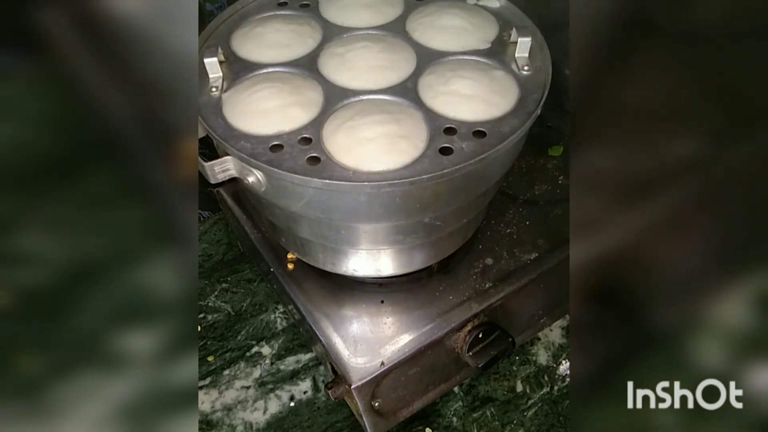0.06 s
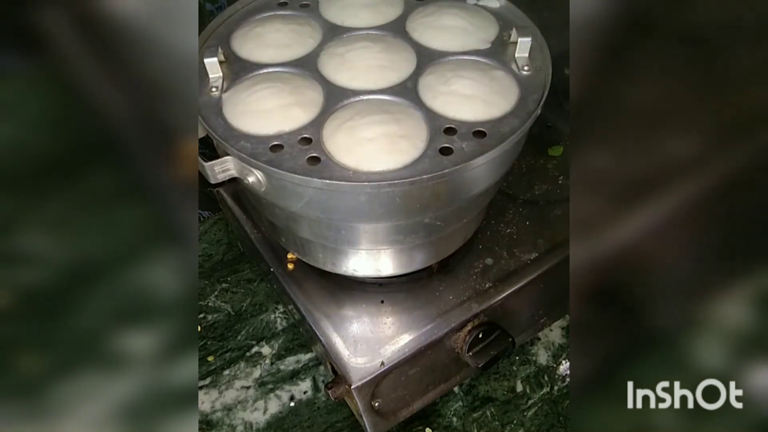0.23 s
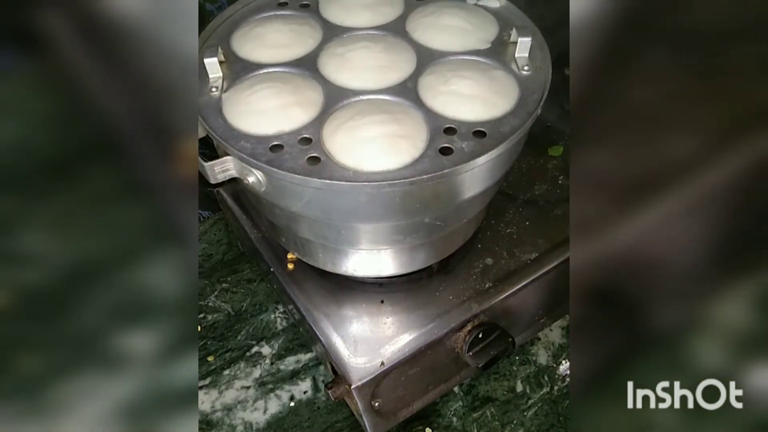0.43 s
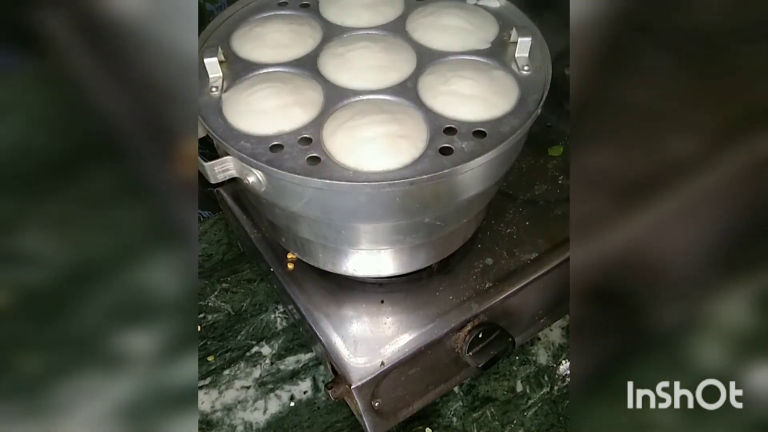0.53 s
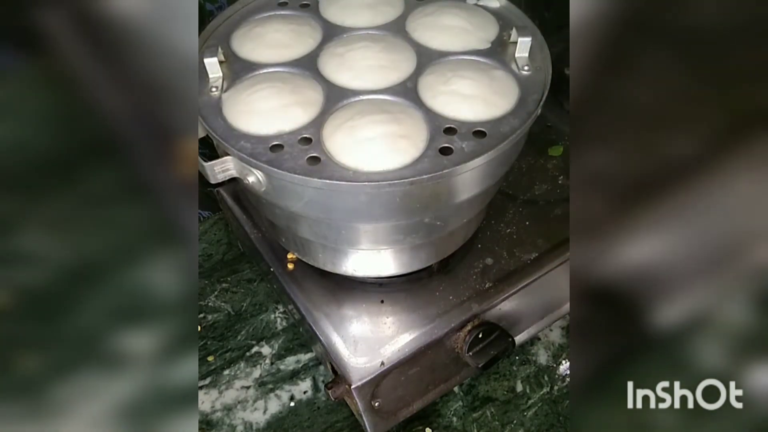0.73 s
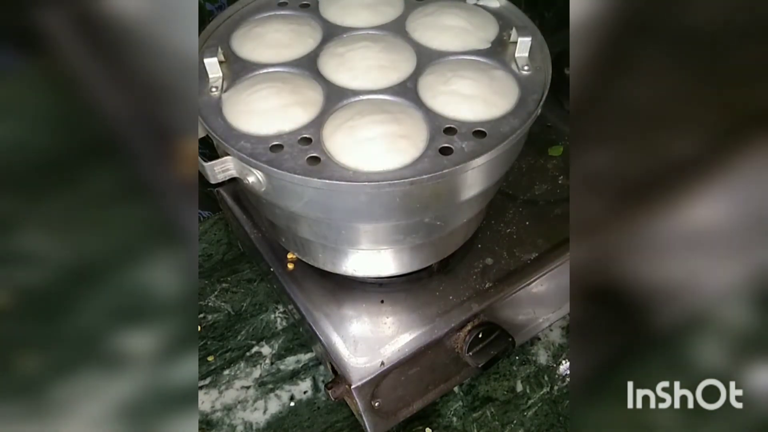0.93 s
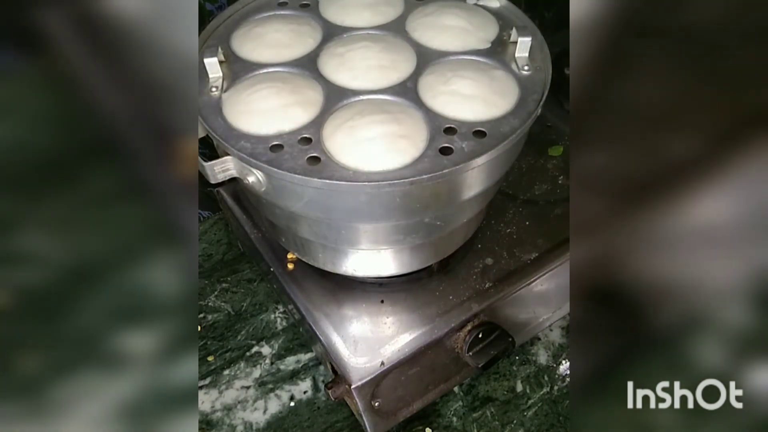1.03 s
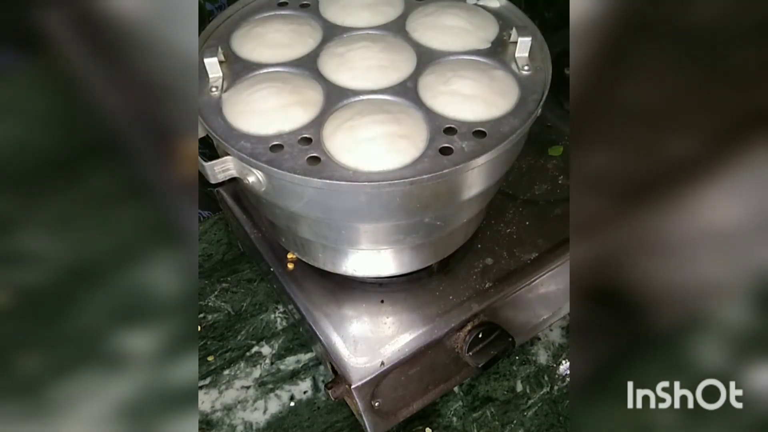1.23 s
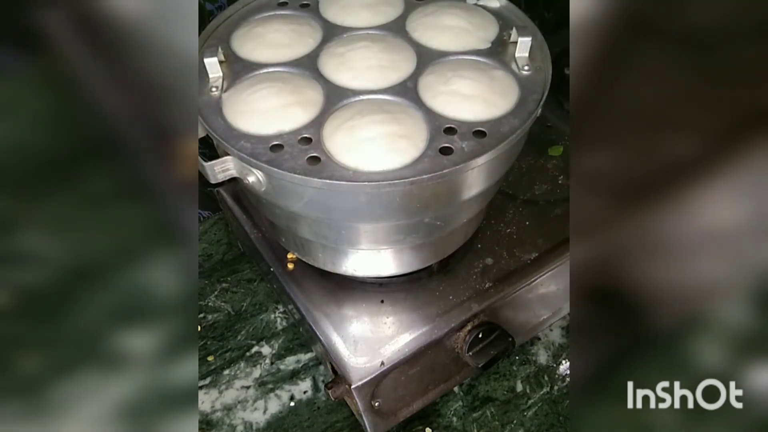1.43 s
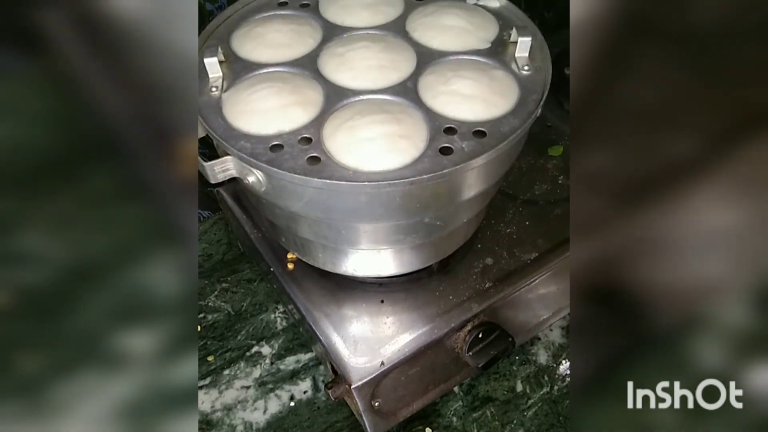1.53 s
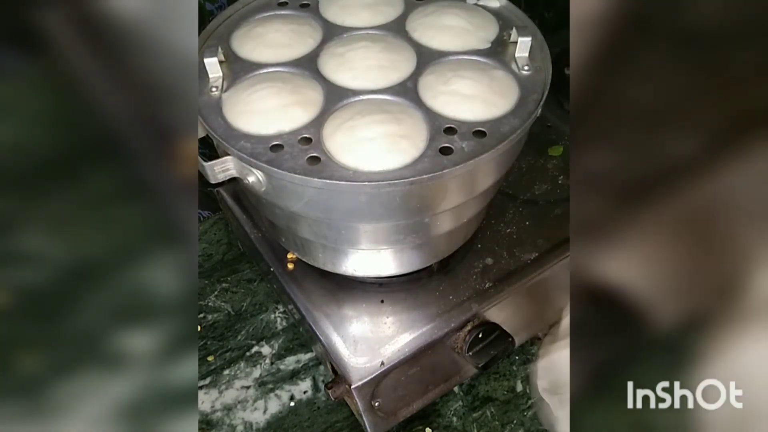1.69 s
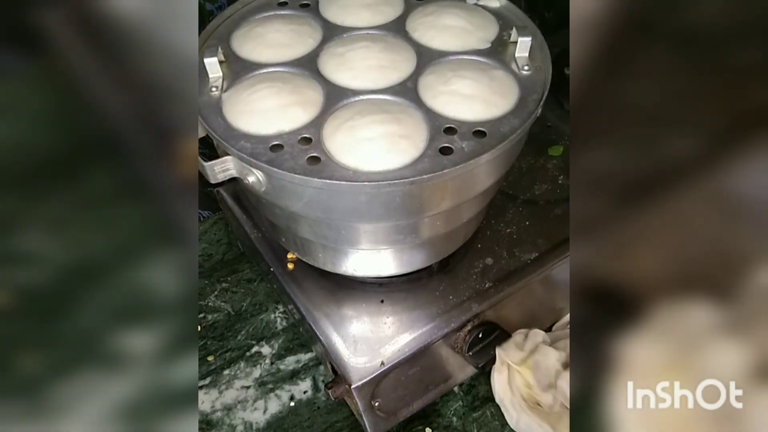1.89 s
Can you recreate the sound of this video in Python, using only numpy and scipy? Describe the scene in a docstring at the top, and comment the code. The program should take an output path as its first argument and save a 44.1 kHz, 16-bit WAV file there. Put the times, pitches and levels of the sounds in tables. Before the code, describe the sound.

Three bright, ringing knocks come from a metal pot lid handled near the microphone in a small kitchen. Duller clunks follow as the lid is set down, and a faint high hiss and whistle linger over quiet room noise.

```python
"""A metal steamer lid is knocked three times and rings, then is set down with a few duller clunks.
Each blow shakes the lid's own notes, echoes in a small kitchen and stirs a low boom.
Over the quiet room noise, a faint high hiss comes and goes and a thin whistle ends the scene.
The recorder's limiter, an automatic volume control, flattens the blows and lets the ring swell back."""
import sys
import numpy as np
from scipy import signal
from scipy.fft import rfft, irfft
from scipy.io import wavfile
from scipy.ndimage import uniform_filter1d, minimum_filter1d

SR = 44100
rng = np.random.default_rng(int(sys.argv[2]) if len(sys.argv) > 2 else 0)


def dump_mix(stems):
    """Bounce the given channels to the path in sys.argv[1] as a 16-bit WAV at rate SR."""
    frames = np.atleast_2d(stems).T  # one column per channel
    limited = np.clip(frames, -1, 1)  # hard clip at full scale
    pcm = np.round(limited * 32767).astype(np.int16)
    wavfile.write(sys.argv[1], SR, pcm)


N = 85995
T = np.arange(N) / SR
HZ = np.fft.rfftfreq(N, 1 / SR)

# Ringing knocks. Each row: start in seconds, ring in dB, clatter in dB, place (0 rim, 1 face),
# treble tilt in dB per octave, pot in dB, boom in dB.
KNOCKS = [(.2425, -6.5, -6, 0.61, -0.88, -14, -31), (.3515, -5, -7, 0.92, 1.24, -20, -35),
          (0.8678, -0.5, -8, 0, 0.4, -35, -30.5)]
# Dull blows. Each row: start in seconds, level in dB, treble tilt in dB per octave,
# hollow note in Hz, that note's level in dB, boom in dB.
CLUNKS = [(.9500, -17.5, 0, 534, -14, -41), (1.0215, -25, 1.5, 913, -30, -53),
          (1.1052, -15, -0.5, 417, -7.5, -39.5), (1.1225, -24.5, -0.5, 357, -17.5, -50),
          (1.2462, -20.5, 1, 463, -13, -32.5), (1.2640, -30, -4, 470, -26, -52)]


def lid_knocks():
    """A knock rings the lid's notes, each as loud as the spot struck allows, and the pot answers."""
    # The lid's own notes in Hz.
    notes_hz = [478, 562, 689, 974, 1428, 2211, 2775, 2870, 3130, 3408, 3549, 3725, 4156, 4385, 4962, 5504,
                5805, 6098, 6592, 6760, 7430, 8131, 8880, 10450]
    # Each row, one per note: fade time in seconds, dB if struck on the rim, dB if struck on the face.
    notes = [(0.13, -6.5, -4.5), (0.11, -2.5, -8), (2.4, -23, -30), (0.69, -26.5, -16), (1.4, -14.5, -10.5),
             (0.44, -44.5, -8.5), (0.55, -31.5, -6.5), (0.49, -10.5, -11.5), (0.16, -8, -6),
             (0.52, -32, -13), (0.51, -26.5, -15), (0.29, -27, -8.5), (0.15, -20, -25.5), (0.087, -37, -6),
             (0.39, -18.5, -17.5), (0.2, -35, -11.5), (0.15, -10.5, -9.5), (0.089, -16.5, -26.5),
             (0.17, -13, -13), (.25, -28.5, -42.5), (0.21, -20.5, -20.5), (0.48, -48, -28.5),
             (0.15, -36, -20.5), (.28, -45.5, -48)]
    # The lid's many weaker notes. Each row: frequency in Hz, level in dB.
    spectrum = [(30, -69), (70, -40.5), (170, -16), (300, -14.5), (480, -0.5), (700, -2), (1000, -3),
                (1500, -13.5), (1950, -18), (2600, -20.5), (2900, -16), (4200, -10.5), (5200, -13.5),
                (6500, -18.5), (7200, -24.5), (8200, -27), (11000, -36.5), (16000, -50.5)]
    # How they die away. Each row: frequency in Hz, fade time in seconds.
    decays = [(100, 0.76), (500, 0.32), (1200, 0.43), (3000, 0.43), (6000, 0.36), (14000, 0.28)]
    ripple_db = uneven_metal()
    near_note = np.exp(-((HZ[:, None] - np.array(notes_hz)) / 60) ** 2).max(1)
    ripple_db += 11 * near_note * np.clip(HZ / 2800, 0, 1)  # weak notes bunch around the main ones
    rings = np.zeros((len(KNOCKS), N))
    for hz, (fade_s, rim_db, face_db) in zip(notes_hz, notes):
        twin_gap_hz = 18.3 * rng.uniform(0.6, 0.83)  # a close second note makes the ring throb
        twin = amp(-12) * tone(twin_gap_hz) * fade(min(fade_s, 0.38))
        room_blur = amp(-8.5) * fade(0.38) * wander(73.3 * np.sqrt(hz / 2000))
        note = (fade(fade_s) + twin + room_blur) * tone(hz)
        for ring, (_, ring_db, _, place, *_) in zip(rings, KNOCKS):
            gain = amp(ring_db + rim_db + (face_db - rim_db) * place)
            ring += gain * (note * np.exp(2j * np.pi * rng.random())).real
    out = np.zeros(N)
    ends = [row[0] for row in KNOCKS[1:]] + [T[-1]]
    pot_band = np.exp(-((HZ - 890) / 326) ** 2)
    for ring, (start, _, clatter_db, _, tilt_db, pot_db, _), end in zip(rings, KNOCKS, ends):
        choke = fade(0.15, after_s=end - start)  # a new knock stops the ring before it
        pot = amp(pot_db) * noise(pot_band) * fade(0.33) * rise(0.0021)
        rattle = amp(clatter_db) * clatter(spectrum, decays, tilt_db, ripple_db)
        add(out, start, ring * choke * rise(0.0041) + pot + rattle)
    return out * fade(0.19, after_s=0.9355)  # the lid comes to rest against something


def lid_clunks():
    """The lid rocks into place with short, hollow knocks, then is softly touched once more."""
    # The resting lid's notes in Hz.
    notes_hz = [365, 775, 1075, 1515, 1590, 2260, 3135, 4000]
    # Each row, one per note: fade time in seconds, level in dB.
    notes = [(0.365, -11.5), (0.42, -16), (0.22, -10.5), (0.38, -10.5), (0.29, -9), (0.57, -27),
             (0.77, -23.5), (0.18, -22)]
    # The dull clatter. Each row: frequency in Hz, level in dB.
    spectrum = [(30, -60), (70, -29), (170, -20), (260, -10), (360, 1.5), (520, 1.5), (680, -4), (1050, -3),
                (1620, -9), (1900, -17), (2100, -17), (2350, -9), (2750, -16.5), (4000, -10), (6200, -19.5),
                (7500, -31), (11000, -46), (16000, -64)]
    # How it dies away. Each row: frequency in Hz, fade time in seconds.
    decays = [(100, 0.42), (400, 0.33), (1200, 0.32), (3000, 0.34), (6000, 0.3), (14000, .33)]
    out, ripple_db = np.zeros(N), uneven_metal()
    for start, db, tilt_db, hollow_hz, hollow_db, _ in CLUNKS:
        ring = sum(amp(note_db) * fade(fade_s) * np.sin(2 * np.pi * (hz * T + rng.random()))
                   for hz, (fade_s, note_db) in zip(notes_hz, notes))
        hollow = amp(hollow_db) * fade(0.073) * (tone(hollow_hz) * (1 + 0.5 * wander(228))).imag
        rattle = amp(db) * clatter(spectrum, decays, tilt_db, ripple_db)
        add(out, start, rattle + (amp(db) * ring + hollow) * rise(0.0022))
    touch = amp(-52) * clatter(spectrum, decays, tilt_db=5, ripple_db=ripple_db) * rise(0.016)
    add(out, 1.70, touch)
    return out


def clatter(spectrum, decays, tilt_db, ripple_db):
    """Crowded notes blur into noise: a crack, bands fading at their own speeds, the kitchen's echo."""
    octaves = np.log2((HZ + 100) / 1000)
    burst = rfft(noise(amp(curve(spectrum) + tilt_db * octaves + ripple_db)))
    centres = np.log([hz for hz, _ in decays])
    bands = sum(irfft(burst * np.interp(np.log(HZ + 1), centres, band), N) * fade(fade_s)
                for band, (_, fade_s) in zip(np.eye(len(decays)), decays))
    crack = 1 + amp(-10) * np.exp(-T / 0.0024)
    echo = amp(-21) * noise(abs(burst) / (1 + (HZ / 6500) ** 4))
    return bands * crack * rise(0.00078) + echo * fade(0.86) * (1 - np.exp(-T / 0.043))


def uneven_metal():
    """Thin metal favours some pitches: random peaks and dips in dB, strongest in the treble."""
    bumps = unit(uniform_filter1d(rng.standard_normal(len(HZ)), size=100))
    return 4.2 * bumps * np.clip(HZ / 7000, 0.4, 1.8)


def boom():
    """A low, wavering note builds up after each knock and clunk."""
    swell = np.zeros(N)
    for start, *_, db in KNOCKS + CLUNKS:
        add(swell, start, amp(db) * fade(0.77) * (1 - np.exp(-T / 0.025)))
    return swell * (tone(hz=91.5) * (1 + 0.6 * wander(38))).real


def hiss():
    """Faint bands of high noise swell and sink."""
    # Each row: start in seconds, length in seconds, low edge in Hz, high edge in Hz, level in dB.
    swells = [(-.25, .54, 4900, 5900, -51), (.135, .17, 6350, 6950, -49), (.16, .14, 5100, 6300, -54),
              (1.12, .68, 4600, 6400, -49)]
    out = np.zeros(N)
    for start, length, low, high, db in swells:
        band = 1 / (1 + ((2 * HZ - low - high) / (high - low)) ** 8)
        progress = np.clip((T - start) / length, 0, 1)
        out += amp(db) * noise(band) * abs(np.sin(np.pi * progress)) ** 1.5
    return out


def whistle():
    """A thin, breathy tone flutters and drifts in pitch."""
    # Each row: time in seconds, pitch in Hz, level in dB.
    path = [(1.62, 4040, -76), (1.69, 4040, -63), (1.705, 4035, -52), (1.77, 4010, -52), (1.815, 4025, -46),
            (1.84, 3995, -55), (1.89, 4015, -52), (1.95, 3985, -53)]
    times, hz, db = np.transpose(path)
    flutter = 1 + 0.42 * unit(wander(140).real) + amp(-10) * wander(140)
    wave = np.exp(2j * np.pi * np.cumsum(np.interp(T, times, hz)) / SR) * flutter
    return amp(np.interp(T, times, db)) * (T > times[0]) * unit(wave.real)


def room_noise():
    """The kitchen's steady, quiet rumble."""
    # Each row: frequency in Hz, relative level in dB.
    spectrum = [(25, -25.5), (60, -0.5), (100, 8.5), (200, -2.5), (380, 1.5), (700, -8), (1500, -12),
                (2000, -21), (4000, -29), (8000, -34.5), (16000, -45.5)]
    return amp(-57.5) * noise(amp(curve(spectrum)))


def amp(db):
    """Turns decibels into a multiplier."""
    return 10 ** (np.asarray(db) / 20)


def unit(x):
    """Scales a signal to an average power of 1."""
    return x / np.sqrt(np.mean(abs(x) ** 2) + 1e-20)


def curve(points):
    """Joins a table's points to give a value at every frequency."""
    hz, value = np.transpose(points)
    return np.interp(np.log(HZ + 1), np.log(hz), value)


def add(mix, start, sound):
    """Mixes a sound in at a start time in seconds."""
    part = mix[round(start * SR):][:len(sound)]
    part += sound[:len(part)]


def fade(fade_s, after_s=0):
    """Holds until after_s, then drops 60 dB in each fade time."""
    return np.exp(-np.log(1000) * np.maximum(T - after_s, 0) / fade_s)


def rise(seconds):
    """Climbs from 0 to 1 and stays there."""
    return np.minimum(T / seconds, 1)


def tone(hz):
    """A pure tone as complex numbers; .real or .imag gives the wave."""
    return np.exp(2j * np.pi * hz * T)


def noise(gain):
    """Noise shaped by a gain for each frequency."""
    return unit(irfft(rfft(rng.standard_normal(N)) * gain, N))


def wander(rate_hz):
    """A random wobble for a tone's strength and phase."""
    real, imag = (np.interp(T * rate_hz, np.arange(1024), row) for row in rng.standard_normal((2, 1024)))
    return unit(real + 1j * imag)


def scene():
    """Everything at one microphone."""
    return (lid_knocks() + lid_clunks() + boom() + room_noise() + hiss() + whistle())[None]


def record(dry):
    """The limiter turns loud moments down; filters trim the deepest bass and highest treble."""
    limit_db, recover_db_per_s, squeeze = -15.5, 136.5, 0.86
    power = uniform_filter1d(dry[0] ** 2, int(0.017 * SR))
    power_db = 10 * np.log10(abs(power) + 1e-12)
    recovery = T * recover_db_per_s
    held_db = np.maximum.accumulate(power_db + recovery) - recovery  # jumps up, sinks steadily
    over_db = np.maximum(held_db - limit_db, 0)
    span = int(0.0053 * SR)  # the turning down starts just before a blow
    coming_db = uniform_filter1d(-minimum_filter1d(-over_db, span), span)
    duck_db = uniform_filter1d(over_db + 0.55 * (coming_db - over_db), size=100)
    limited = dry / amp(squeeze * duck_db)
    low_cut = signal.butter(N=2, Wn=40, btype="high", fs=SR, output="sos")
    high_cut = signal.firwin(511, 16100, window=("kaiser", 9), fs=SR)
    return signal.oaconvolve(signal.sosfilt(low_cut, limited), high_cut[None], "same")


dry = scene()
out = record(dry)
dump_mix(out)
```